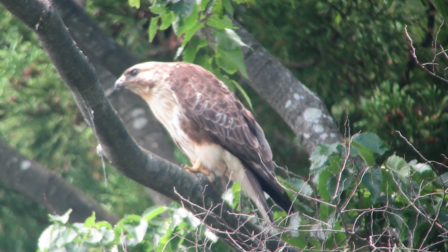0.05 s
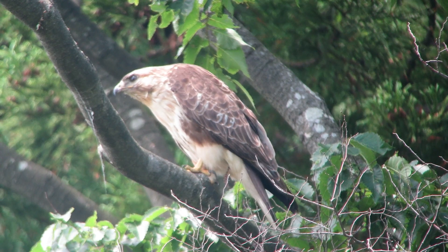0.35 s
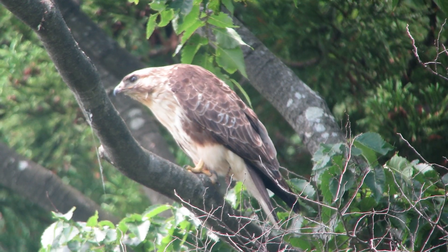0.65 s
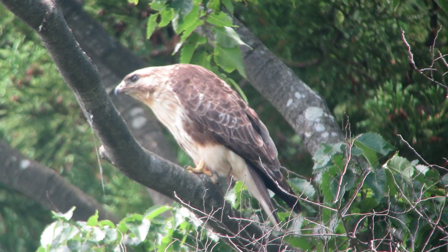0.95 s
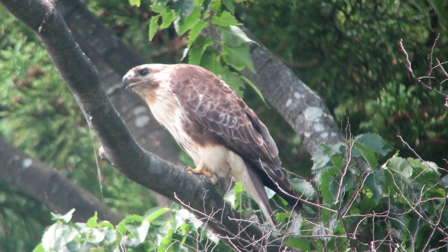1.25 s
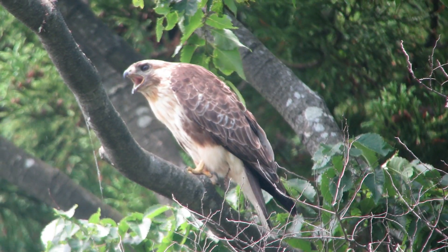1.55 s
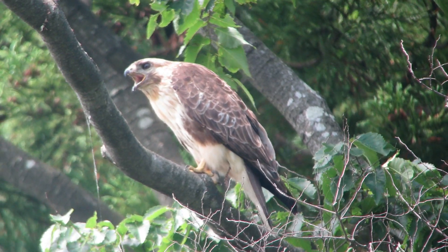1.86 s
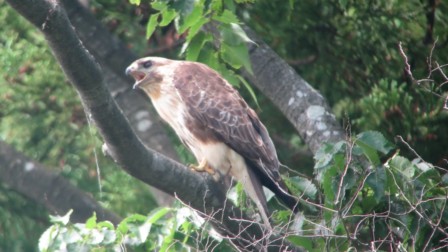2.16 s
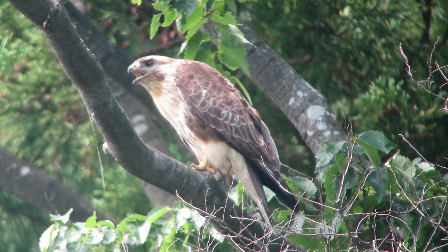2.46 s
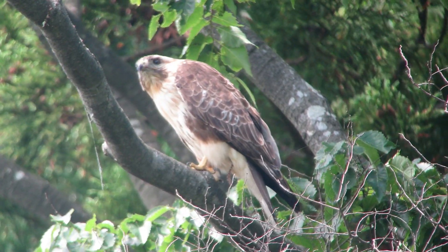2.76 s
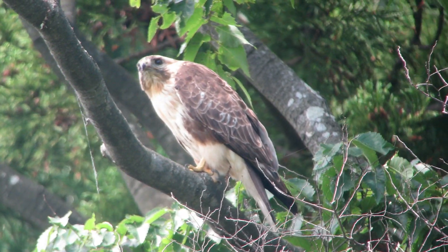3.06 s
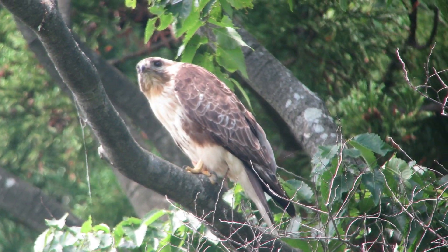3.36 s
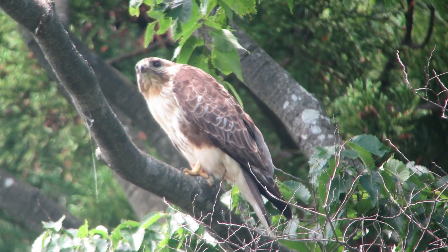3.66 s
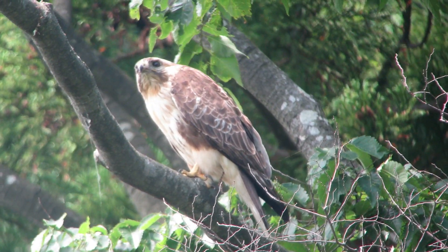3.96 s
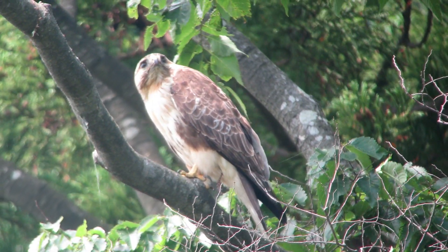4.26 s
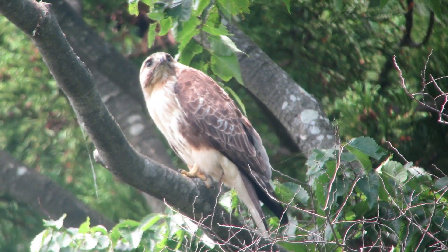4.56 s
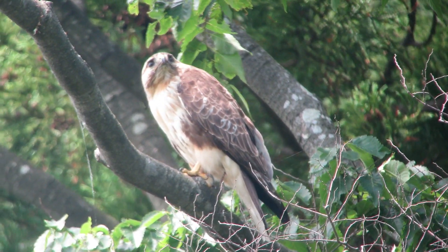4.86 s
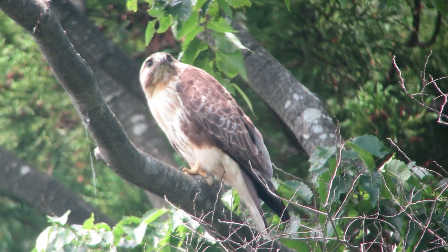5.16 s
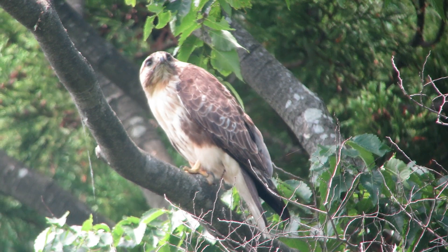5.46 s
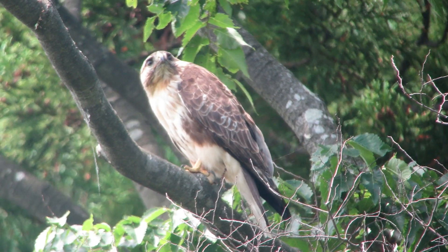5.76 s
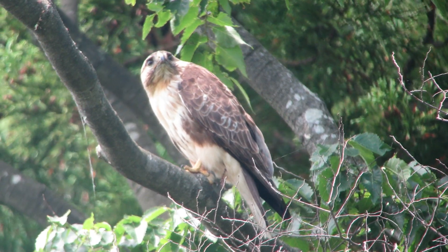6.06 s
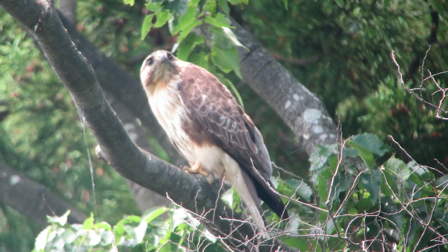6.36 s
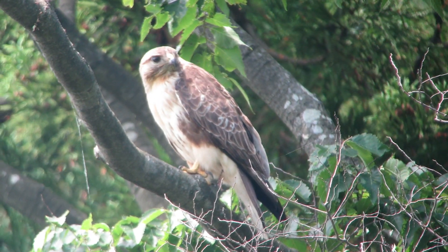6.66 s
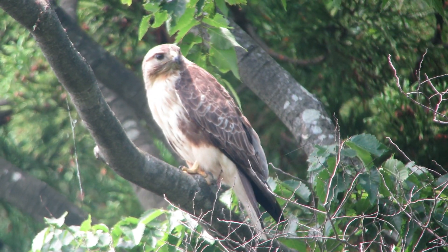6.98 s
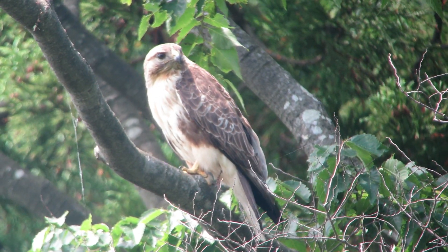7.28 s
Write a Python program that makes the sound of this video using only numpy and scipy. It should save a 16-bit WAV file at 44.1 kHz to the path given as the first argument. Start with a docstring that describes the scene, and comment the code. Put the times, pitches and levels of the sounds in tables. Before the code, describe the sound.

Wind bumps the microphone over a soft hiss of leaves, and a buzzard calls once with a drawn-out descending whistle.

```python
"""Gusts buffet a camcorder's stereo microphone in a wood, over a steady hiss of foliage and electronics.
Half a second in, a hard buffet drives the gain control down; the hiss creeps back over about a second.
Then a perched buzzard gives one drawn-out mew from its syrinx: a hoarse upward slur and a long
falling whistle that the trees echo. The wind keeps bumping the microphone to the end."""
import sys
import numpy as np
from scipy import signal
from scipy.fft import rfft, irfft
from scipy.io import wavfile
from scipy.ndimage import uniform_filter1d

SR = 44100
rng = np.random.default_rng(int(sys.argv[2]) if len(sys.argv) > 2 else 0)


def digitize_waveform(pressure):
    """Quantize a signal to 16-bit integers and store it at the path in sys.argv[1].

    Rows of a 2-D input are taken as channels; values are limited to [-1, 1].
    """
    field = np.atleast_2d(pressure).T
    bounded = np.clip(field, -1, 1)
    quanta = np.round(bounded * 32767).astype(np.int16)
    wavfile.write(sys.argv[1], SR, quanta)


N = 322812
TIME = np.arange(N) / SR
BINS = np.arange(N // 2 + 1) * SR / N

# the strongest single eddies to hit the microphone: t/s, relative peak level/dB, f/Hz
EDDIES = [(0.124, -6, 417), (0.151, -4, 385), (0.177, 0, 293), (0.251, -10, 362), (0.291, -2.5, 231),
          (0.437, -5.5, 387), (0.489, 2, 314), (0.499, -5, 524), (0.528, 10, 413), (0.606, -9, 302),
          (0.676, -8.5, 262), (0.783, -14.5, 403), (0.862, -9, 250), (0.9, -7, 255), (0.925, -13, 424),
          (1.535, -16, 304), (1.587, -16, 318), (1.908, -13, 273), (1.942, -13, 380), (1.966, -15.5, 338),
          (2.048, -15, 333), (2.162, -15, 328), (2.196, -17, 340), (2.317, -16, 227), (3.07, -8.5, 283),
          (3.121, -11, 180), (3.137, -8.5, 207), (3.219, -11, 166), (3.325, -14, 227), (3.342, -10, 267),
          (3.369, -12.5, 310), (3.401, -11, 278), (3.545, -12, 237), (3.575, -7.5, 286),
          (3.601, -12.5, 200), (3.65, -11, 227), (3.817, -8.5, 340), (3.855, -8.5, 337), (3.904, -7.5, 250),
          (3.917, -7, 172), (3.986, -13, 178), (4.041, -16, 165), (4.098, -11, 134), (4.215, -18, 198),
          (4.453, -13, 204), (4.551, -13, 388), (4.594, -14.5, 152), (4.714, -18, 400), (4.743, -14.5, 264),
          (4.762, -16, 219), (4.903, -17.5, 340), (4.911, -17, 180), (4.969, -16.5, 217), (5.019, -15, 256),
          (5.055, -23.5, 270), (5.32, -11, 170), (5.385, -11.5, 222), (5.463, -15.5, 198),
          (5.919, -17.5, 182), (6.043, -18.5, 218), (6.271, -17.5, 225), (6.306, -13.5, 191),
          (6.404, -19, 170), (6.58, -18.5, 188), (6.621, -10.5, 196), (6.675, -13.5, 220),
          (6.779, -10, 230), (6.805, -10, 183), (6.865, -15, 282), (6.927, -14, 306)]
# how the wind meets the microphone: t/s, share from the side/0-1, gain of large slow eddies/dB
WIND_ANGLE = [(.3, 0.96, -2), (.8, 0.21, -20.5), (2.1, 0.22, -21.5), (2.7, 0.3, -13), (3.2, 0.71, -2),
              (5.4, 0.76, 6), (6.8, 0.77, 5)]


def undb(db):
    """Decibels to gain."""
    return 10 ** (np.asarray(db) / 20)


def curves(table):
    """Each column of a table of times, joined by straight lines."""
    times, *columns = np.transpose(table)
    return [np.interp(TIME, times, column) for column in columns]


def spectra(table):
    """Each column of a table of frequencies, joined on a log axis."""
    hz, *columns = np.transpose(table)
    return [np.interp(np.log(BINS + 1), np.log(hz), column) for column in columns]


def shape(x, gain):
    """Filter by a gain for each frequency."""
    return irfft(rfft(x) * gain, N)


def unit(x):
    """Scale to rms 1."""
    return x / np.sqrt(np.mean(x ** 2))


def wander(hz):
    """Smooth random drift of rms 1, no faster than about hz."""
    return unit(shape(rng.standard_normal(N), np.exp(-(BINS / hz) ** 2)))


def envelope(start, end, attack_s, release_s):
    """Straight rise, hold and straight fall."""
    return np.clip(np.minimum((TIME - start) / attack_s, (end - TIME) / release_s), 0, 1)


def airflow(swell_db=2.2, wake_db=-11.5, wake_s=0.0065):
    """Wind level in dB: gusts and the wakes of single eddies add their power to a swelling breeze."""
    # the breeze between gusts: t/s, relative level/dB
    breeze = [(0, -27), (.38, -39), (.65, -35), (1.1, -36), (1.83, -45), (2.48, -46), (2.75, -37.5),
              (4.1, -34.5), (4.9, -37.5), (5.15, -51), (5.6, -35.5), (5.85, -39.5), (6.75, -36), (7.1, -51)]
    # gusts on the microphone: start t/s, length/s, relative level/dB
    gusts = [(0.1, 0.11, -16), (0.197, 0.15, -23.5), (0.26, 0.062, -19.5), (0.409, 0.12, -17.5),
             (0.558, 0.097, -25.5), (0.666, 0.05, -22), (0.8, 0.15, -25), (1.233, 0.16, -34),
             (1.661, 0.13, -31), (1.874, 0.13, -26.5), (2.005, 0.12, -28), (2.118, 0.13, -30.5),
             (2.267, 0.14, -33.5), (2.543, 0.1, -34), (3.067, 0.14, -29.5), (3.204, 0.12, -29),
             (3.308, 0.056, -16.5), (3.525, 0.11, -28.5), (3.73, 0.16, -26.5), (3.895, 0.043, -19),
             (4.086, 0.055, -24), (4.182, 0.083, -26), (4.396, 0.12, -27.5), (4.727, 0.066, -25.5),
             (4.839, 0.061, -27.5), (5.25, 0.2, -28.5), (5.292, 0.056, -23.5), (6, 0.11, -35),
             (6.436, 0.055, -24.5), (6.56, 0.069, -24), (6.688, 0.16, -28), (6.834, 0.16, -30),
             (7.254, 0.068, -34)]
    power = undb(curves(breeze)[0] + swell_db * wander(22)) ** 2
    for start, length, db in gusts:
        power += (undb(db) * envelope(start, start + length, attack_s=0.018, release_s=0.035)) ** 2
    for at, peak_db, _ in EDDIES:
        gap_s = np.abs(TIME - at)
        near = gap_s < 4 * wake_s
        power[near] += (undb(peak_db + wake_db) * np.exp(-gap_s[near] / wake_s)) ** 2
    return 10 * np.log10(power)


def turbulence(gain_db=1.8, flicker_db=3.5, light_db=-33, hard_db=-15, large_hz=190, evenness=0.91):
    """Air rumbles right at the microphone: brighter as it blows harder, deeper when eddies are large."""
    # rumble spectra of a light and a hard gust: f/Hz, relative level/dB
    light_gust = [(20, -35), (40, -38), (70, 2), (150, 4), (260, -5.5), (420, -20), (750, -41), (1500, -92)]
    hard_gust = [(20, -48), (40, -42), (70, -22), (150, 1), (280, 2), (450, -10.5), (750, -24),
                 (1050, -36.5), (1500, -65)]
    wind_db = airflow()
    hardness = np.clip((wind_db - light_db) / (hard_db - light_db), 0, 1)
    noise = rng.standard_normal(N)
    light, hard = (unit(shape(noise, undb(spectra(gust)[0]))) for gust in (light_gust, hard_gust))
    rumble = (1 - hardness) * light + hardness * hard
    large_eddies = shape(rumble, 1 / (1 + (BINS / large_hz) ** 4))
    rumble += large_eddies * (undb(curves(WIND_ANGLE)[1]) - 1)
    # within a gust the eddies follow each other with much the same strength
    local_power = uniform_filter1d(rumble ** 2, size=1100)
    rumble = unit(rumble / local_power ** (evenness / 2))
    return unit(rumble * undb(flicker_db * wander(91))) * undb(wind_db + gain_db)


def wind(eddy_gain_db=-1, width_cycles=0.46):
    """Turbulence and the short pressure swings of single eddies reach the two channels differently."""
    # wind pickup of the stereo microphone: f/Hz, phase lead of left/rad, left minus right/dB
    ports = [(40, .1, -12), (90, 0.18, -2), (168, 1.26, -5), (310, 2.1, 0.5), (590, 2.71, 5),
             (1000, 2.4, 6)]
    rumble = turbulence()
    for at, peak_db, hz in EDDIES:
        cycles = (TIME - at) * hz
        near = np.abs(cycles) < 4
        window = np.exp(-(cycles[near] / width_cycles) ** 2)
        swing = undb(peak_db + eddy_gain_db) * window * np.sin(2 * np.pi * cycles[near])
        # a strong eddy displaces the small ones as it passes
        rumble[near] = rumble[near] * (1 - np.sqrt(window)) - swing
    lead, balance_db = spectra(ports)
    left_over_right = undb(balance_db) * np.exp(1j * lead)
    side = shape(rumble, (left_over_right - 1) / (left_over_right + 1)) * curves(WIND_ANGLE)[0]
    return np.array([rumble + side, rumble - side])


def hiss(sway_db=0.1):
    """An even bed of distant foliage and microphone noise; the bass is alike on both sides."""
    # hiss spectrum: f/Hz, level in a 1 Hz band/dB, left-right correlation/-1 to 1
    noise_floor = [(25, -72, .95), (99, -90, 0.92), (354, -74, 0.52), (980, -76.5, 0.59),
                   (1940, -78.5, 0.59), (4130, -81, 0.49), (4500, -81, 0.36), (6150, -86, -0.31),
                   (8000, -86.5, -0.46), (9600, -89.5, -0.25), (12000, -89, 0.053), (14000, -95, 0),
                   (15400, -99, -0.77)]
    db, correlation = spectra(noise_floor)
    mid = shape(rng.standard_normal(N), undb(db) * np.sqrt(SR / 4 * (1 + correlation)))
    side = shape(rng.standard_normal(N), undb(db) * np.sqrt(SR / 4 * (1 - correlation)))
    return np.array([mid + side, mid - side]) * undb(sway_db * wander(12))


def whine(hz=15734, left_db=-77, right_db=-69):
    """The camcorder's electronics leak a thin line-scan tone, stronger on the right."""
    return undb([[left_db], [right_db]]) * np.sqrt(2) * np.sin(2 * np.pi * hz * TIME)


def buzzard(jitter=0.021, shimmer=0.7, rasp_depth=0.7, rasp_hz=430, waver_db=2.4, breath_db=-7):
    """The syrinx whistles four harmonics; when hoarse it flutters and a rasp adds sidebands."""
    # the mew slurs up, holds, breaks downward, sags and droops:
    # t/s, fundamental f/Hz, level of 2nd harmonic/dB, 3rd relative to 2nd/dB
    mew = [(1.722, 1185, -42.5, -18), (1.745, 1375, -46, -7), (1.765, 1510, -49, -8), (1.78, 1675, -45, -3),
           (1.792, 1727, -34, -4), (1.821, 1718, -34, -11), (1.838, 1660, -41.5, -11),
           (1.862, 1540, -43, -11), (1.91, 1475, -42, -12), (1.96, 1435, -48, -8),
           (2.06, 1372, -48.5, -4.5), (2.16, 1323, -45.5, -5.5), (2.21, 1308, -52, -3),
           (2.28, 1291, -56, 4), (2.35, 1278, -49, -5), (2.47, 1250, -44.5, -14), (2.55, 1220, -51, -6),
           (2.615, 1192, -47.5, -15), (2.665, 1135, -46, -16), (2.72, 1068, -50, -16),
           (2.76, 1025, -57, -12)]
    # voice quality: t/s, roughness/0-1, fundamental/dB, 4th harmonic/dB (both relative to the 2nd)
    voice = [(1.735, 0.7, -10, -28), (1.77, .9, -6, -22), (1.795, 0.12, -19, -29), (1.85, 0.35, -5.5, -13),
             (1.92, .2, -11, -13), (2.055, 0.2, -1, -5), (2.085, 0.2, -6, -23), (2.32, 0.35, -4.5, -16),
             (2.48, 0.2, -15, -19), (2.72, 0.45, -18, -25)]
    # weak lines between the harmonics, from unequal alternate cycles: multiple of the pitch, level/dB
    half_lines = [(1.5, -20), (2.5, -11), (3.5, -12.5), (4.5, -16.5)]
    hz, level_db, third_db = curves(mew)
    roughness, first_db, fourth_db = curves(voice)
    unsteady_hz = hz * (1 + jitter * roughness * wander(200) + 0.0024 * wander(47))
    phase = 2 * np.pi * np.cumsum(unsteady_hz) / SR
    # the membranes beat unevenly, so each harmonic wavers in strength
    tone = sum(undb(db + waver_db * wander(55)) * np.sin(k * phase)
               for k, db in enumerate([first_db, 0, third_db, fourth_db], 1))
    # the period doubles as the pitch sags below 1380 Hz
    doubling = np.clip((1380 - hz) / 120, 0, 1) * undb(waver_db * wander(24))
    tone += doubling * sum(undb(db) * np.sin(k * phase + 0.35 * wander(120)) for k, db in half_lines)
    rasp = np.sin(2 * np.pi * np.cumsum(rasp_hz * (1 + 0.191 * wander(157))) / SR)
    tone *= 1 + roughness * (shimmer * wander(260) + rasp_depth * rasp)
    # air rushes through the resonance of the open beak
    breath = unit(shape(rng.standard_normal(N), np.exp(-((BINS - 3400) / 1600) ** 2)))
    sounding = envelope(mew[0][0], mew[-1][0], attack_s=0.0061, release_s=0.031)
    return sounding * undb(level_db) * (np.sqrt(2) * tone + undb(breath_db) * roughness * breath)


def wood(call, t60_s=0.21, scatter_db=-6, build_s=0.0017):
    """The call arrives dead centre, with echoes off near trunks and a diffuse tail from the crowns."""
    # echoes off the trunks: delay t/s, left level/dB, right level/dB
    trunks = [(.024, -15, -17), (.048, -7, -12), (.078, -18, -21), (.25, -19, -25)]
    t = TIME[:2 * SR]
    response = rng.standard_normal((2, len(t))) * undb(-60 * t / t60_s) * (1 - np.exp(-t / build_s))
    response *= undb(scatter_db) / np.linalg.norm(response, axis=1, keepdims=True)
    response[:, 0] += 1  # straight from perch to microphone
    for delay, left_db, right_db in trunks:
        response[:, int(delay * SR)] += undb([left_db, right_db])
    return signal.fftconvolve(call[None], response, axes=1)[:, :N]


def scene():
    """The bird off in the trees, wind on the microphone, hiss and whine underneath."""
    return wood(buzzard()) + wind() + hiss() + whine()


def record(dry, threshold_db=0.5, recovery_db_per_s=16.5, knee_db=2, low_cut_hz=45, top_hz=15830):
    """The camcorder's gain control ducks at once and recovers slowly; deep bass and top are cut."""
    peak_db = 20 * np.log10(np.abs(dry).max(axis=0) + 1e-9)
    recovery_db = recovery_db_per_s * TIME
    held_db = np.maximum.accumulate(peak_db + recovery_db) - recovery_db
    duck_db = knee_db * np.logaddexp(0, (held_db - threshold_db) / knee_db)
    out = dry * undb(-uniform_filter1d(uniform_filter1d(duck_db, size=50), size=50))
    # overloads are rounded: only the part of the excess below 2 kHz is taken off
    excess = out - np.clip(out, -0.95, 0.95)
    out -= shape(excess, 1 / (1 + (BINS / 2000) ** 12))
    out = shape(out, BINS ** 2 / np.hypot(BINS ** 2, low_cut_hz ** 2))
    return signal.sosfilt(signal.ellip(12, 0.1, 80, top_hz, fs=SR, output="sos"), out)


dry = scene()
out = record(dry)
digitize_waveform(out)
```